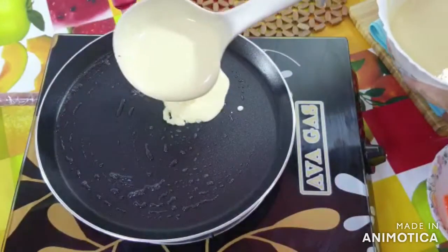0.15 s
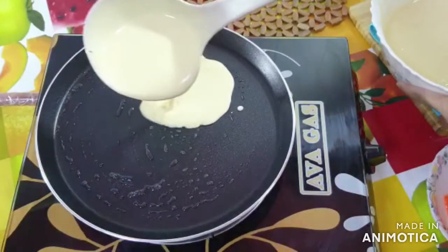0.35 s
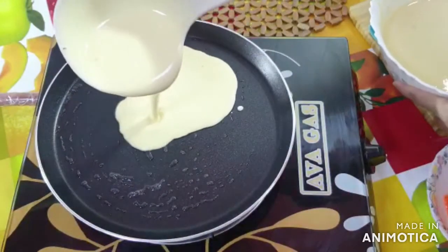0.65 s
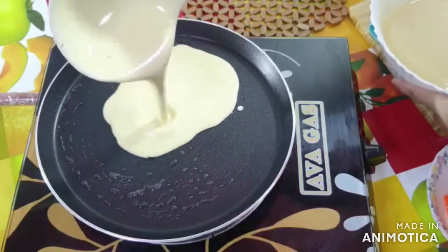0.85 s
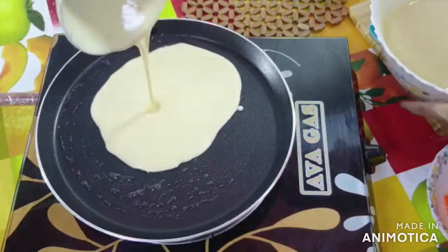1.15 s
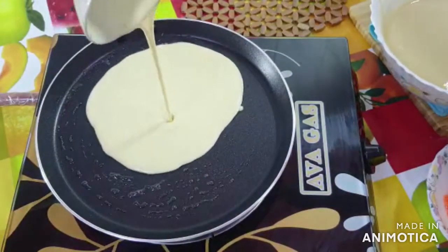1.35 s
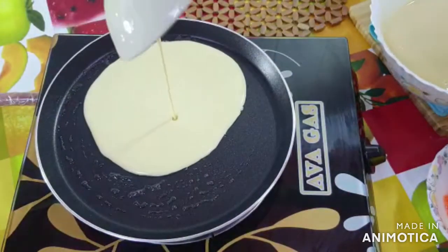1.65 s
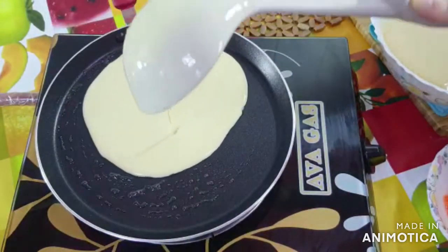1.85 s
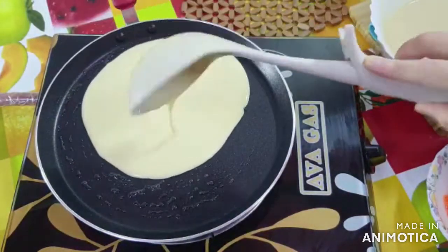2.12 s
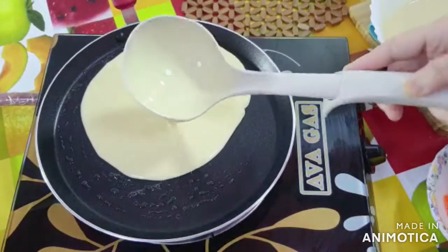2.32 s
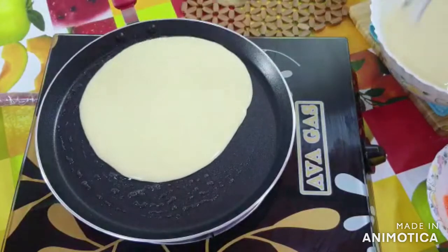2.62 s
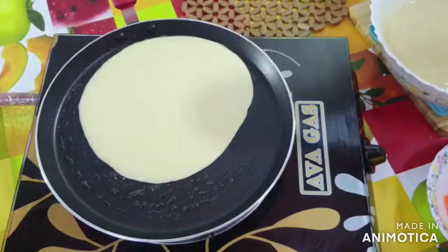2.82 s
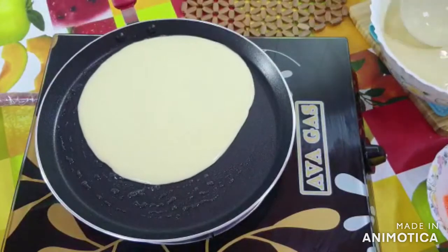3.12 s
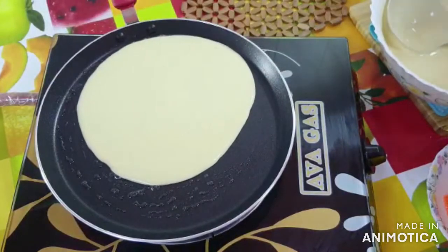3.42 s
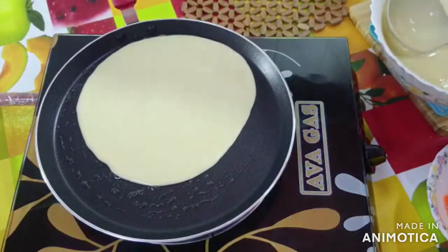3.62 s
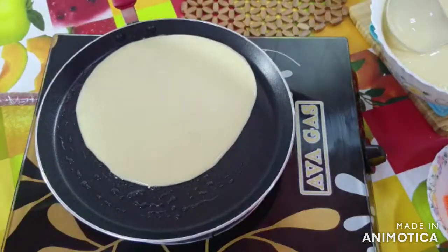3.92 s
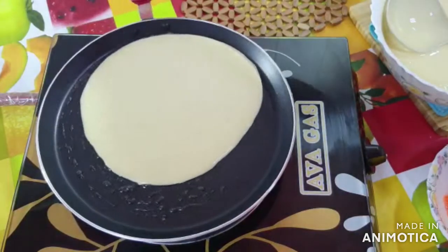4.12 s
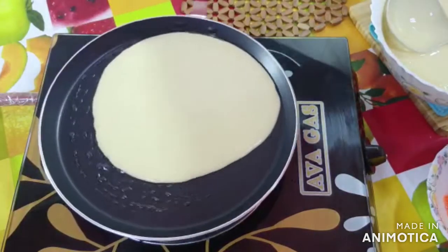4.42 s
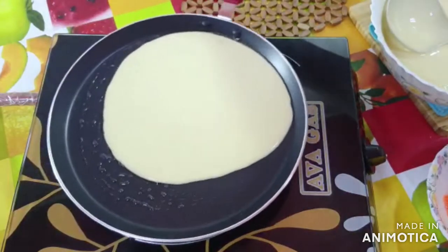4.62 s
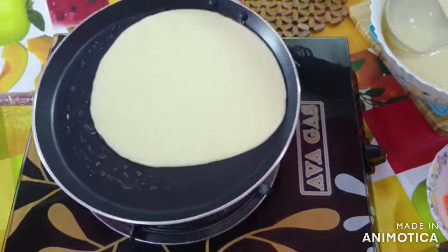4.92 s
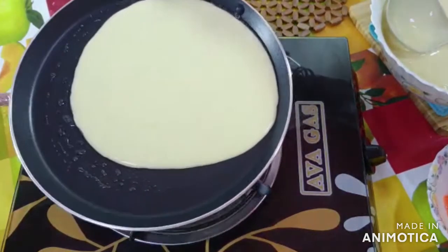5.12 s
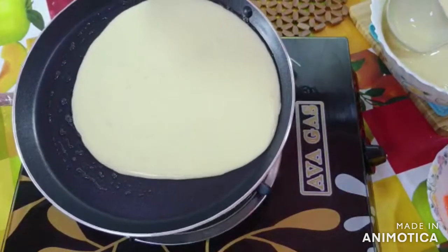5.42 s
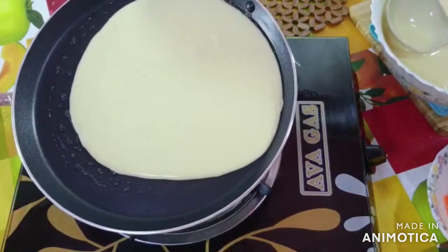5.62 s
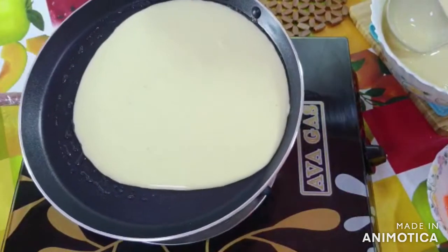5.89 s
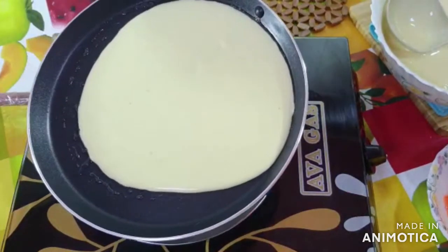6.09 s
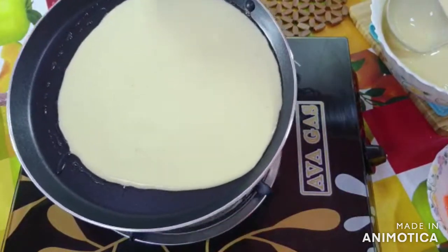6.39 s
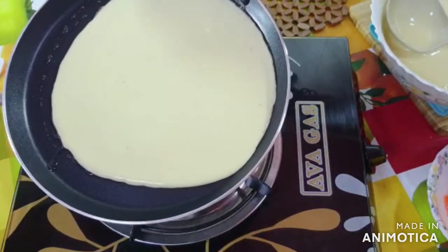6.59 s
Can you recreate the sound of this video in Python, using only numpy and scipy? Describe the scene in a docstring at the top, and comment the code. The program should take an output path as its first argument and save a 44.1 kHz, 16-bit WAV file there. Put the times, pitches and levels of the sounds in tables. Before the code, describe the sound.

Batter lands in a hot oiled pan with a sharp crack, then sizzles with wet bubbling and a few small spits. As the sizzle calms, a plastic ladle drops into a bowl and rattles. The pan scrapes and bumps lightly over the stove grate, and a softer sizzle returns. A low hum of burner and room lies underneath, heard in a small kitchen on a closely spaced pair of microphones.

```python
"""A sharp crack of steam, then a sizzle: batter is ladled into a hot oiled pan on a gas stove.
Its bubbles slowly calm, with a few spits from the oil, over the low hum of burner and room.
The ladle drops back into its bowl and rattles; the pan is dragged over the grate and tilted,
and the sizzle revives as batter runs onto hot metal.
Heard in a small kitchen, on a closely spaced pair of microphones."""
import sys
import numpy as np
from scipy import signal
from scipy.fft import rfft, irfft
from scipy.io import wavfile
from scipy.ndimage import uniform_filter1d

SR = 44100
rng = np.random.default_rng(int(sys.argv[2]) if len(sys.argv) > 2 else 0)


def transcribe(u):
    """Save the signal u as a 16-bit wav file named by the first command-line argument.

    u: samples, shape (n,) or (channels, n), limited to [-1, 1]; the rate is SR.
    q: integer samples, one column per channel.
    """
    v = np.clip(np.atleast_2d(u).T, -1, 1)
    q = np.round(v * 32767).astype(np.int16)
    wavfile.write(sys.argv[1], SR, q)


N = 297675
T = np.arange(N) / SR
HZ = np.fft.rfftfreq(N, 1 / SR)

# how alike the two microphones hear the room: (frequency [Hz], likeness [0-1])
MIC_LIKENESS = [(40, 0.64), (120, 0.79), (300, 0.89), (700, 0.48), (1400, 0.27), (3000, 0), (16000, 0)]
# modes of pan and stove top together: (frequency [Hz], level flat [dB], level tipped [dB], t60 [s])
STOVE_MODES = [(149, -13, -13.5, .12), (270, -13, -9, .05), (341, -2, -3, .12), (366, -4, -3, .1),
               (408, -9, 1, .1), (472, -4, -3, .07), (523, -8, 0, .15), (572, -5, -4, .07),
               (626, 1, -6, .11), (678, 0, -4, .13), (752, -4, -1, .1), (829, 1, -5, .09),
               (900, -7, -7, .06), (1080, -2, 0, 0.022), (1357, -3, 2, 0.035), (1450, 0, -1, 0.04),
               (1590, -12, -2, 0.038), (1880, -7, -12, 0.062), (2050, -13, -14, .033)]


def amp(db):
    """Decibels to gain."""
    return 10 ** (np.asarray(db) / 20)


def unit(x):
    """Scales to an rms of one."""
    return x / np.sqrt(np.mean(x ** 2) + 1e-20)


def read(points, hz):
    """Reads a table on a log-frequency axis."""
    f, value = np.transpose(points)
    return np.interp(np.log(hz + 1), np.log(f + 1), value)


def colour(x, spectrum):
    """Gives a long signal a spectrum, at an rms of one."""
    return unit(irfft(rfft(x) * amp(read(spectrum, HZ)), N))


def pair(x):
    """Makes two unrelated channels alike in the bass, as at two closely spaced microphones."""
    likeness = np.clip(read(MIC_LIKENESS, HZ), -1, 1)
    left, other = rfft(x)
    right = likeness * left + np.sqrt(1 - likeness ** 2) * other
    return irfft(np.array([left, right]), N)


def wander(rate_hz):
    """A slow random curve with an rms of one."""
    return unit(irfft(rfft(rng.standard_normal(N)) / (1 + (HZ / rate_hz) ** 4), N))


def clicks(per_s, spread_db):
    """Random clicks, many small and a few large, on two channels."""
    size = amp(spread_db * np.minimum(rng.exponential(1, N), 5))
    occurs = rng.random(N) < per_s / SR
    return unit(size * occurs * rng.standard_normal((2, N)))


def since(s):
    """Seconds since time s, zero before it."""
    return np.maximum(T - s, 0)


def envelope(start, rise_s, end, fade_db_per_s):
    """A gain that rises from start and fades from end."""
    return np.minimum(since(start) / rise_s, 1) * amp(-fade_db_per_s * since(end))


def add(mix, s, sound):
    """Places a sound in the mix at time s."""
    part = mix[:, max(round(s * SR), 0):][:, :sound.shape[-1]]
    part += sound[..., :part.shape[1]]


def kitchen(x, wet_db):
    """The small room: dense reflections follow 2 ms behind the direct sound and die faster in the treble."""
    # reverberation: (frequency [Hz], t60 [s])
    decay_times = [(150, 0.65), (500, 0.51), (2000, 0.53), (6000, 0.54), (15000, 0.35)]
    hz, t, z = signal.stft(pair(rng.standard_normal((2, N)))[:, :SR], SR, nperseg=256)
    tail = signal.istft(z * amp(-60 * t / read(decay_times, hz)[:, None]), SR, nperseg=256)[1]
    tail *= np.clip((T[:tail.shape[1]] - .002) / 0.00057, 0, 1)
    return x + amp(wet_db) * signal.fftconvolve(x, tail / np.linalg.norm(tail[0]), axes=1)[:, :N]


def snap(spectrum, t60):
    """A brief burst with a given spectrum and an energy of one at each microphone."""
    z = rfft(rng.standard_normal((2, 4096)) * amp(-60 * T[:4096] / t60))
    hz = np.fft.rfftfreq(4096, 1 / SR)
    z[1] += z[0] * 4 * np.clip(read(MIC_LIKENESS, hz), 0, 1)
    burst = irfft(z / abs(z) * amp(read(spectrum, hz)))[:, :1024]
    return burst / np.linalg.norm(burst, axis=1, keepdims=True)


def cracks():
    """Water flashes to steam under the first batter: a sharp crack that fills the kitchen."""
    # bursts in the oil as the batter lands: (time [s], level [dB])
    bursts = [(.002, -6.5), (.025, 8.5), (0.033, -6)]
    # spectrum of one burst: (frequency [Hz], level [dB])
    crack_spectrum = [(200, -25), (340, -12.5), (480, -7.5), (600, -9.5), (800, -3.5), (960, -1.5),
                      (1200, -2), (1650, 6.5), (1900, -2), (2220, 8), (2700, -1), (3700, -1.5), (4800, -16),
                      (6500, 2.5), (9000, -11), (12000, 1), (16000, -8)]
    out = np.zeros((2, N))
    for s, db in bursts:
        add(out, s, amp(db) * snap(crack_spectrum, t60=0.012))
    return kitchen(out, wet_db=-5.0)


def boiling(simmer_db=-6.5, simmer_hold_s=1.25, simmer_fade_db_per_s=5.5, drying_db_per_s=3):
    """Gains of fizz and wet bubbles: flowing batter boils fiercely, then simmers till its underside sets."""
    # batter meets hot metal in a splat, the pour, a dribble, then a creep and a run as the pan tilts:
    # (start [s], rise [s], fade from [s], fizz level [dB], wet bubbles relative to fizz [dB])
    wettings = [(0, 0.00082, 0.054, -42.5, -4), (0, 0.34, 1.256, -44, -6.5), (1.41, 0.015, 1.357, -47.5, 3),
                (4.3, 0.26, 5.2, -58, -34), (5.15, 0.48, 7.29, -52.5, -34)]
    fizz_power = wet_power = 0
    for start, rise_s, end, db, wet_db in wettings:
        flash = envelope(start, rise_s, end, fade_db_per_s=34) ** 2
        covered_area = np.cumsum(flash) / SR
        simmer = covered_area * amp(simmer_db - simmer_fade_db_per_s * since(end + simmer_hold_s)) ** 2
        power = amp(db) ** 2 * (flash + simmer)
        fizz_power += power
        wet_power += power * amp(wet_db - drying_db_per_s * since(end)) ** 2  # big bubbles die out first
    return np.sqrt(fizz_power), np.sqrt(wet_power)


def patchy(x, depth_db):
    """Patches about 600 Hz wide and 70 ms long swell and fade, as crowds of like bubbles come and go."""
    z = signal.stft(x, nperseg=512)[2]
    patches = uniform_filter1d(rng.standard_normal(z.shape[:0:-1]), size=12, axis=0)  # along time
    patches = uniform_filter1d(patches, size=7, axis=1)  # along frequency
    return unit(signal.istft(z * amp(depth_db * unit(patches).T), nperseg=512)[1][:, :N])


def ladle_hollow(bubbles, lift_s=0.91, glide_s=0.36, near_hz=2170, far_hz=1520, width_hz=690):
    """The hollow between ladle and pan resonates; its pitch sinks and fades as the ladle is lifted."""
    hz = far_hz + (near_hz - far_hz) * np.exp(-since(lift_s) / glide_s)
    carrier = np.exp(2j * np.pi * np.cumsum(hz) / SR)
    pole = np.exp(-np.pi * width_hz / SR)
    resonance = carrier * signal.lfilter([(1 - pole) ** 2], np.poly([pole, pole]), bubbles / carrier)
    return amp(-16.5 - 17 * since(lift_s)) * unit(resonance.real)


def sizzle():
    """Countless tiny steam bubbles fizz; bigger wet ones burst lower while the batter still runs."""
    # spectrum of the tiny bubbles: (frequency [Hz], level [dB])
    fizz_spectrum = [(600, -12), (1230, -15.5), (1520, -1), (2000, -1.5), (2600, -1.5), (4000, 0),
                     (4600, 0.5), (5300, 1.5), (5800, 0), (6300, 1.5), (6800, -1.5), (7400, 0.3),
                     (8300, -2), (11000, -2), (13300, -1.5), (13900, -10), (15000, -2.5), (16000, -27)]
    # spectrum of the big wet bubbles: (frequency [Hz], level [dB])
    wet_spectrum = [(300, -9.5), (430, -7.5), (580, -18), (780, -4), (930, -2.5), (1080, 2.5), (1280, -1),
                    (1600, -0.5), (2600, -1), (4500, -2.5), (8000, -10), (16000, -31)]
    fizz_gain, wet_gain = boiling()
    fizz = colour(rng.standard_normal((2, N)) + .45 * clicks(2500, 1.6), fizz_spectrum)
    fizz = fizz_gain * patchy(fizz, depth_db=1.1)
    bubbles = pair(rng.standard_normal((2, N)) + 0.26 * clicks(700, 1.3))
    wet = wet_gain * colour(bubbles, wet_spectrum) + fizz_gain * ladle_hollow(bubbles)
    return fizz * amp(0.13 * wander(36.9)) + wet * amp(0.56 * wander(24))


def hum(uneven_db=0.7):
    """Room tone: uneven low rumble and faint hiss of burner and kitchen, with a few wavering tones."""
    # spectrum of burner and room: (frequency [Hz], level [dB])
    hum_spectrum = [(20, -16), (48, -3.5), (75, -3.5), (100, 1.5), (130, 0.5), (180, -6), (250, -11),
                    (380, -10), (550, -23.5), (1100, -20.5), (3000, -24), (8000, -15.5), (13000, -13.5),
                    (15500, -14), (16500, -31.5)]
    # steady tones of the room: (frequency [Hz], width [Hz], level [dB])
    room_tones = [(97.5, 4, -70), (154, 3, -71.5), (195, 5, -77)]
    noise = pair(rng.standard_normal((2, N)))
    bass = signal.lfilter(*signal.butter(1, 300, fs=SR), noise)
    bass_swell = bass * (amp(uneven_db * wander(7.5)) - 1)
    rumble = amp(-58.5) * colour(noise + bass_swell, hum_spectrum)
    for hz, width, db in room_tones:
        peak = 1 / (1 + (2 * (HZ - hz) / width) ** 2)
        rumble += amp(db) * unit(irfft(rfft(rng.standard_normal(N)) * peak, N))
    return rumble


def spits_and_ticks(snap_t60=0.0082):
    """A snap and a brief ring: a drop of water bursts in the oil, or ladle or pan makes light contact."""
    # spits in the oil, plus thin high ticks of the ladle on the bowl's rim (3.084 s) and the pan
    # on the grate (4.6072 s): (time [s], level [dB], pitch [Hz], ring t60 [s], snap [gain])
    events = [(0.1507, -28, 7200, .012, 0.4), (.967, -38, 3780, 0.0035, 1), (1.1565, -35, 1990, 0.006, 1.3),
              (1.2238, -37, 1610, 0.022, 1.3), (1.4352, -28.5, 4500, 0.005, 1.6),
              (1.469, -36.5, 2500, 0.012, 0.4), (1.484, -33, 14000, 0.004, 0.5),
              (2.4308, -25, 7050, 0.0045, 0.25), (2.431, -25, 9400, 0.003, 0.45),
              (3.084, -33, 14400, 0.02, 1.1), (4.3215, -34.5, 6700, 0.0047, 0),
              (4.6072, -29, 14900, 0.003, 0.15)]
    out, t = np.zeros((2, N)), T[:2048]
    for s, db, hz, t60, snap_gain in events:
        burst = rng.standard_normal((2, len(t))) * amp(-60 * t / snap_t60)
        ping = np.sin(2 * np.pi * hz * t) * amp(-60 * t / t60)
        low_cut = signal.butter(2, .4 * hz, "high", fs=SR)
        add(out, s, amp(db) * signal.lfilter(*low_cut, ping + snap_gain * burst))
    return kitchen(out, wet_db=-2.5)


def ring(modes, corner_hz, clank=0, rise_s=.0002, flutter=.55):
    """Modes die away after one blow; a soft blow, with a low corner, misses the high ones."""
    out = np.zeros((2, SR))
    for k, (hz, db, t60) in enumerate(modes):
        t = T[:min(int(1.2 * t60 * SR), SR)]
        polarity = (-1) ** k  # neighbours swing opposite ways
        decay = amp(db - 60 * t / t60) / np.hypot(1, hz / corner_hz)
        contact = 1 + clank * (hz > 5500) * np.exp(-t / .006)  # high modes leap up briefly
        mode = polarity * decay * contact * np.exp(2j * np.pi * hz * t)
        knots = rng.standard_normal((2, 128, 2)) @ [1, 1j]
        if hz < 1000:  # low modes flutter as the vessel rocks, alike at both microphones
            knots[1] = knots[0]
            depth, per_s = flutter, 75
        else:  # a loose contact buzzes against the high ones
            depth, per_s = 1.0, 115
        wobble = np.array([np.interp(t * per_s, np.arange(128), row) for row in knots])
        wobble *= np.minimum(t / .008, 1)
        add(out, 0, (mode * (1 + depth * wobble)).imag)
    return out * (1 - np.exp(-T[:SR] / rise_s))


def knock(noise, corner_hz, t60=0.31, bass_hz=520, bass_rise_s=0.0097):
    """One dull knock: a soft blow is darker, and the bass takes a moment to build."""
    hz = np.fft.rfftfreq(SR, 1 / SR)
    z = rfft(noise) / np.hypot(1, hz / corner_hz)
    bass = irfft(z / (1 + (hz / bass_hz) ** 10), SR)
    return (irfft(z, SR) - bass * np.exp(-T[:SR] / bass_rise_s)) * amp(-60 * T[:SR] / t60)


def ladle():
    """The ladle rattles into the bowl, which rings at once; handle and heavy table take up blows slowly."""
    # ladle against bowl: (time [s], knock [dB], hardness corner [Hz], bowl ring [dB],
    # handle ring [dB], table boom [dB], tap [dB], cup click [dB])
    blows = [(3.105, -35.5, 696, -64, -33.5, -50, -36, -41.5), (3.148, -47, 455, -69, -27, -62, -50, -59),
             (3.39, -27, 12100, -21, -27, -25.5, -1, -43), (3.438, -32, 1800, -36, -57, -45, -18, -53),
             (3.466, -41, 2000, -48, -62, -50, -17, -56), (3.503, -39, 700, -54, -34, -39, -15, -50),
             (3.526, -42.5, 1000, -31, -52, -38, -21, -60), (3.548, -44, 1200, -50, -61, -53, -23, -60)]
    # modes of the bowl, several in close, beating pairs: (frequency [Hz], level [dB], t60 [s])
    bowl_modes = [(560, -16, .18), (655, -11, .22), (750, -10, .34), (856, -11.5, .28), (920, -1.5, .29),
                  (962, -7, .15), (1643, -11.5, .28), (1675, -12.5, .3), (2570, -20.5, .3),
                  (2612, -17.5, .33), (3655, -19, .38), (3705, -23.5, .32), (4750, -22.5, .3),
                  (4815, -21.5, .3), (6010, -20.5, .26), (6490, -18.5, .14), (7210, -13.5, .2),
                  (8460, -22, .27), (9800, -24, .2), (11130, -24.5, .28), (12580, -24.5, .27),
                  (13650, -27, .1), (14380, -31, .3)]
    # modes of the ladle's handle: (frequency [Hz], level [dB], t60 [s])
    handle_modes = [(299, -13, .28), (359, 1, .32), (599, -11, .22)]
    # modes of the table under the bowl: (frequency [Hz], level [dB], t60 [s])
    table_modes = [(95, -9, .55), (128, -8, .35)]
    # modes of the ladle's thin plastic cup: (frequency [Hz], level [dB], t60 [s])
    cup_modes = [(1677, -2, 0.099), (1880, -2, .1), (2053, -3.5, 0.11), (2150, -1, .08)]
    # the sharp tap on the bowl: (frequency [Hz], level [dB])
    tap_spectrum = [(200, -38), (700, -20), (1200, 8), (1700, 10), (2300, 5), (3000, -9), (5000, -13),
                    (6800, 6), (8500, -12), (16000, -14)]
    # the plastic's dull knock: (frequency [Hz], level [dB])
    thud_spectrum = [(40, -20), (75, -9), (135, -8.5), (180, -13), (260, -15), (340, -10), (450, -10),
                     (520, -3.5), (620, -.5), (930, -4), (1120, -15), (1500, -15.5), (2000, -16),
                     (3000, -24), (7000, -26), (16000, -38)]
    rings, knocks = np.zeros((2, 2, N))
    thud = colour(pair(rng.standard_normal((2, N))), thud_spectrum)
    for k, (s, knock_db, corner_hz, bowl_db, handle_db, table_db, tap_db, cup_db) in enumerate(blows):
        add(rings, s, amp(bowl_db) * ring(bowl_modes, corner_hz, clank=2.6))
        add(rings, s, amp(handle_db) * ring(handle_modes, corner_hz, rise_s=0.03, flutter=0.3))
        add(rings, s, amp(table_db) * ring(table_modes, corner_hz, rise_s=0.032))
        add(rings, s, amp(cup_db) * ring(cup_modes, corner_hz=np.inf))
        add(rings, s, amp(tap_db) * snap(tap_spectrum, t60=0.04))
        add(knocks, s, amp(knock_db) * knock(thud[:, k * SR // 2:][:, :SR], corner_hz))
    return amp(-5) * kitchen(rings, wet_db=-9) + amp(-4) * kitchen(knocks, wet_db=-2)


def handle_on_rim():
    """As the ladle settles, its handle slips down the rim of the bowl with a thin rasp."""
    # spectrum of the rasp: (frequency [Hz], level [dB])
    rasp_spectrum = [(1500, -7), (3700, -0.5), (5000, 0), (7200, -9), (9500, -9), (12000, 1), (13500, -6),
                     (14350, 7), (15000, -11), (16000, 1)]
    rasp = colour(clicks(900, 1.16), rasp_spectrum)
    return amp(-50.5) * rasp * envelope(start=3.52, rise_s=.04, end=3.625, fade_db_per_s=70)


def stove_modes(s, tip_s=4.48):
    """Modes of the pan and stove top at time s: tipping moves the point of contact, so others speak."""
    return [(hz, tipped_db if s > tip_s else flat_db, t60) for hz, flat_db, tipped_db, t60 in STOVE_MODES]


def rubbed(slip_spectrum, hz, t60, swell_db=2.5, pitch_drift=.013, drift_hz=6):
    """One resonance kept sounding by tiny slips; it drifts and swells as the point of contact moves."""
    width_hz = np.log(1000) / (np.pi * t60)
    offset_hz = HZ - hz
    tone = np.fft.ifft(slip_spectrum / (1 + 2j * offset_hz / width_hz) / (1 + (offset_hz / 150) ** 2), N)
    lock = .3 if hz < 850 else 0  # stick and slip lock onto low modes and even out their level
    tone = (tone / (abs(tone) + 1e-12) ** lock).real
    tone *= amp(swell_db * wander(drift_hz))
    drifted_time = T + pitch_drift * np.cumsum(wander(drift_hz)) / SR
    return np.sqrt(t60) * unit(np.array([np.interp(drifted_time, T, side) for side in tone]))


def pan_on_grate():
    """Tiny slips and a few bumps ring the pan and stove top, duller as the pan tips; grit adds a hiss."""
    # the pan slides, first flat, then tipped: (start [s], rise [s], fade from [s], rubbing [dB],
    # brightness corner [Hz], grit rise [s], grit fade from [s], grit [dB])
    slides = [(4.035, 0.018, 4.07, -52.5, 600, 0.051, 4.04, -57.5),
              (4.08, 0.14, 4.34, -48, 2600, 0.24, 4.406, -51),
              (4.519, 0.0073, 4.68, -45.5, 380.3, 0.1, 4.61, -59.5)]
    # hiss of grit under the pan: (frequency [Hz], level [dB])
    grit_spectrum = [(600, -11), (1500, 0.5), (2700, -8), (4000, -4.5), (6400, -2.5), (8500, -10),
                     (13000, -4.5), (16000, -11)]
    # the pan bumps the grate: (time [s], ring [dB], hardness corner [Hz], clack [dB])
    bumps = [(4.168, -56, 2998, -19), (4.524, -42.5, 800, -30), (4.548, -47.5, 490, -40),
             (4.578, -45, 440, -38), (4.606, -44, 420, -39), (4.621, -49, 500, -28), (4.648, -50, 500, -35),
             (4.657, -46, 500, -39), (4.73, -51, 405, -46)]
    # the clack of a bump: (frequency [Hz], level [dB])
    clack_spectrum = [(300, 3.5), (1100, -7), (1500, 4), (2050, 2), (2500, -28), (16000, -42)]
    slip_spectrum = rfft(clicks(1400, 0.71))
    tones = [rubbed(slip_spectrum, hz, t60) for hz, _, _, t60 in STOVE_MODES]
    grit = colour(clicks(3700, 0.62), grit_spectrum)
    sliding = np.zeros((2, N))
    for start, rise_s, end, rub_db, corner_hz, grit_rise_s, grit_end, grit_db in slides:
        rub = sum(tone * amp(db) / np.hypot(1, hz / corner_hz)
                  for tone, (hz, db, _) in zip(tones, stove_modes(start)))
        sliding += amp(rub_db) * rub * envelope(start, rise_s, end, fade_db_per_s=188)
        sliding += amp(grit_db) * grit * envelope(start, grit_rise_s, grit_end, fade_db_per_s=71)
    out = pair(sliding)
    for s, ring_db, corner_hz, clack_db in bumps:
        add(out, s, amp(ring_db) * ring(stove_modes(s), corner_hz))
        add(out, s, amp(clack_db) * snap(clack_spectrum, t60=0.03))
    return kitchen(out, wet_db=-2.5)


def scene():
    """Stove, bowl and room as they reach the two microphones."""
    return sizzle() + cracks() + spits_and_ticks() + ladle() + handle_on_rim() + pan_on_grate() + hum()


def record(dry, low_cut_hz=42, band_limit_hz=16100):
    """The microphone pair: uneven balance and a low cut, clipping at full scale, then the band limit."""
    # balance of the microphones: (frequency [Hz], left minus right [dB])
    mic_balance = [(60, -3), (380, -5), (700, -1.5), (1150, -1.9), (2400, 0), (5000, 0), (9000, -1),
                   (15000, -1)]
    balanced = irfft(rfft(dry) * amp(np.outer([.5, -.5], read(mic_balance, HZ))), N)
    trimmed = signal.lfilter(*signal.butter(2, low_cut_hz, "high", fs=SR), balanced)
    lowpass = signal.firwin(511, band_limit_hz, window=("kaiser", 9), fs=SR)
    return signal.oaconvolve(np.clip(trimmed, -1, 1), lowpass[None], "same", axes=1)


dry = scene()
out = record(dry)
transcribe(out)
```